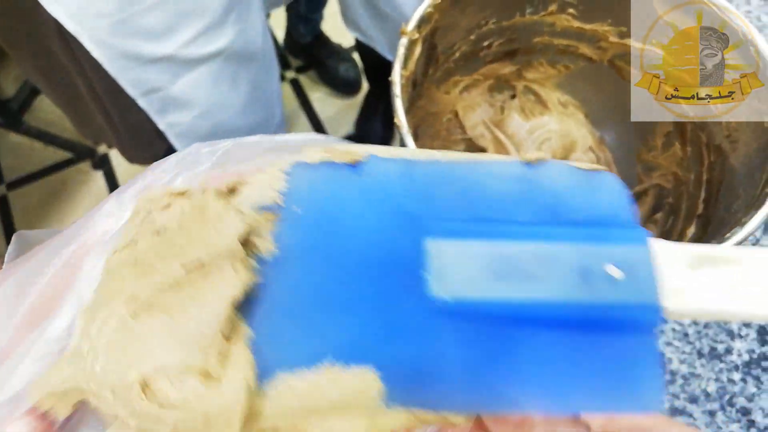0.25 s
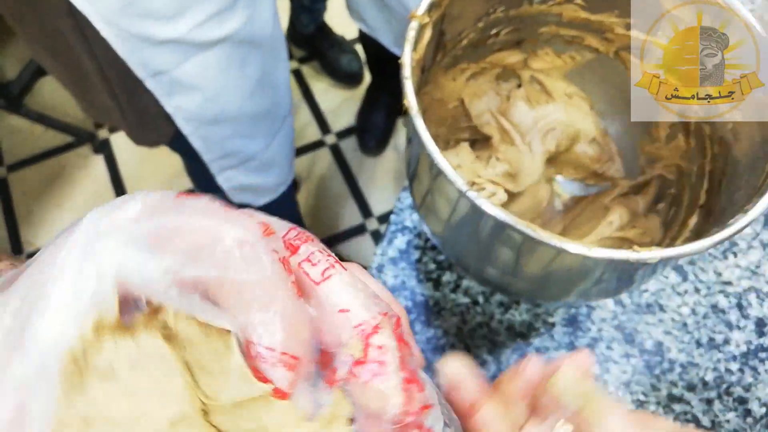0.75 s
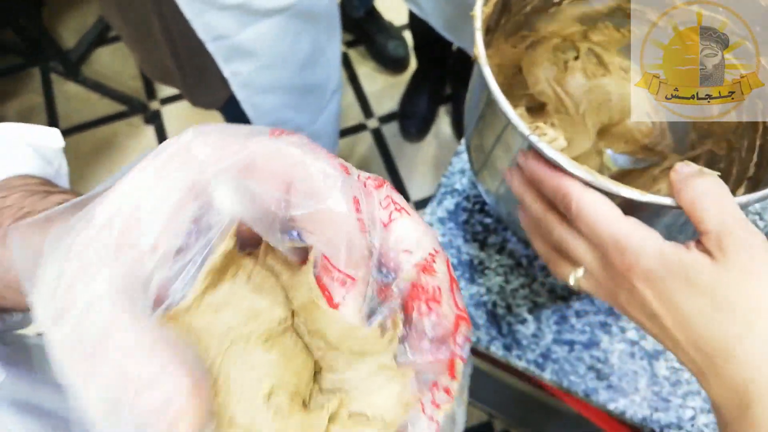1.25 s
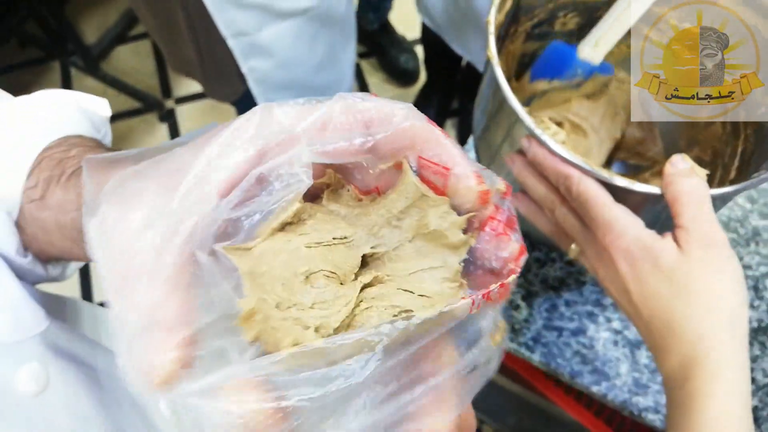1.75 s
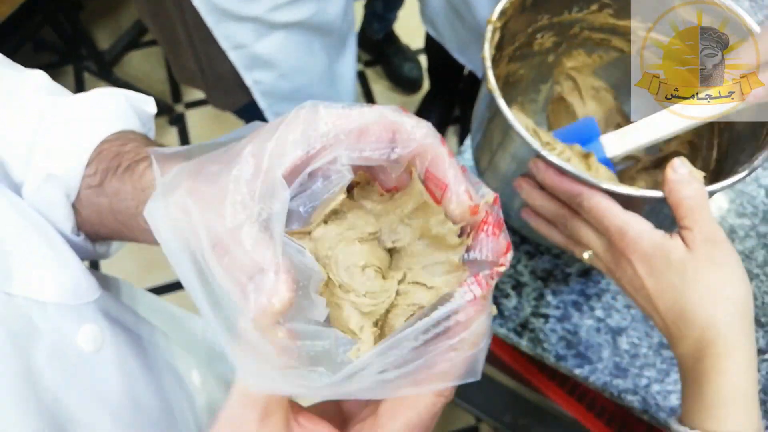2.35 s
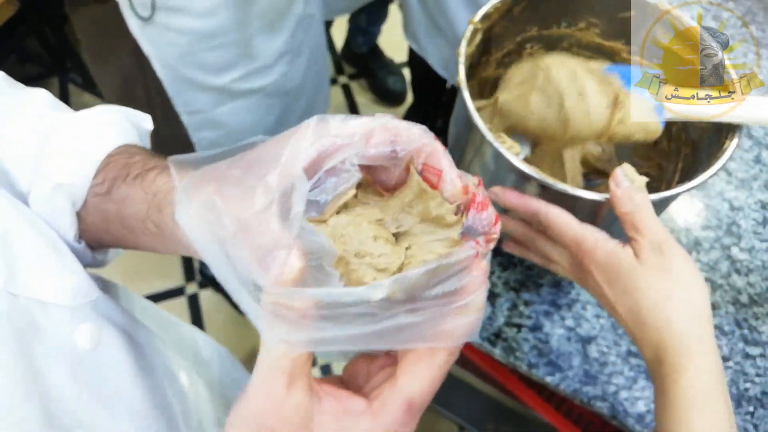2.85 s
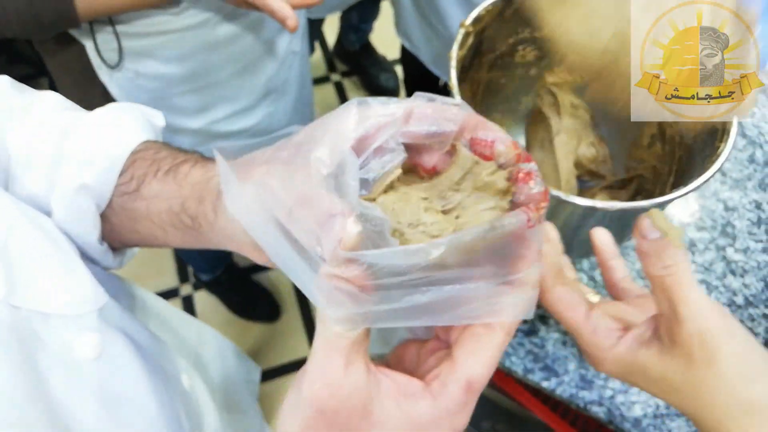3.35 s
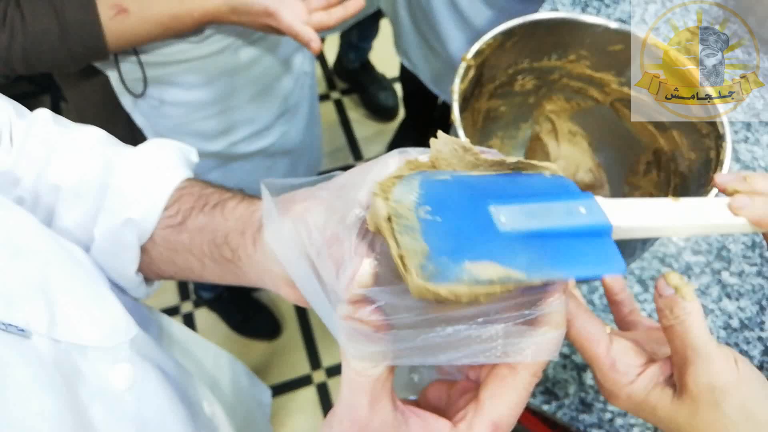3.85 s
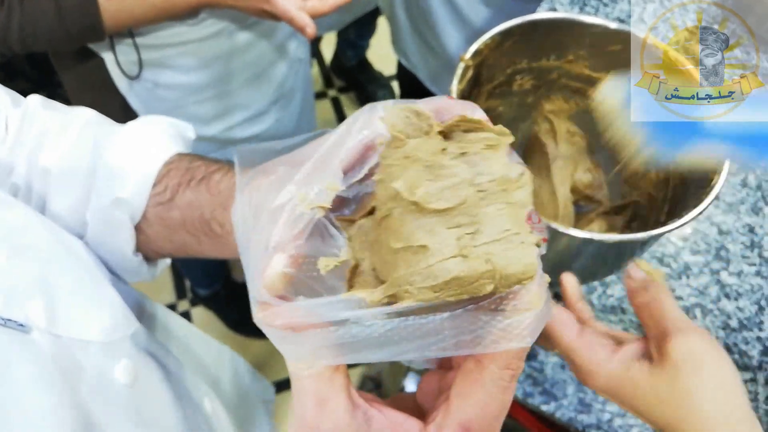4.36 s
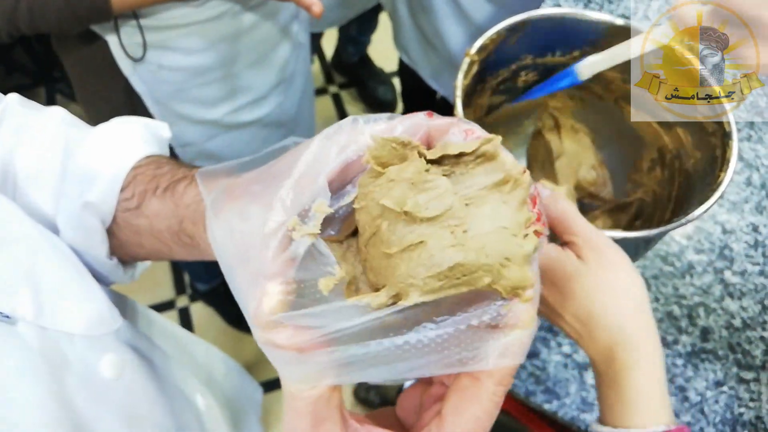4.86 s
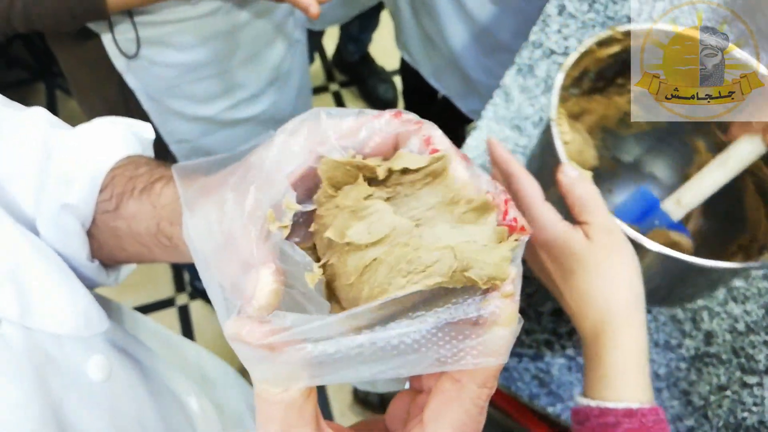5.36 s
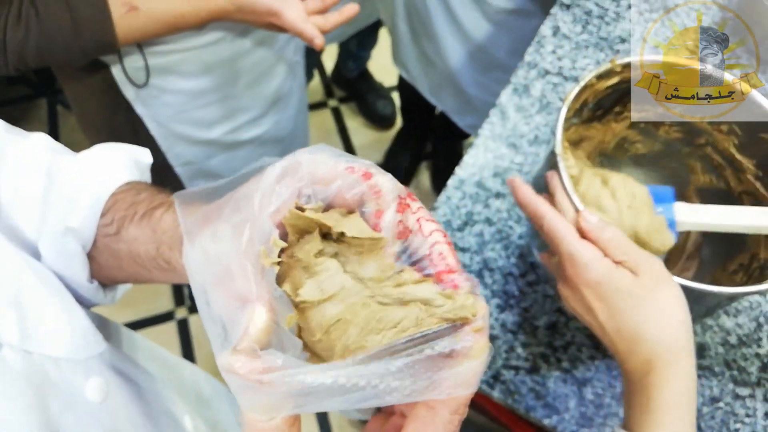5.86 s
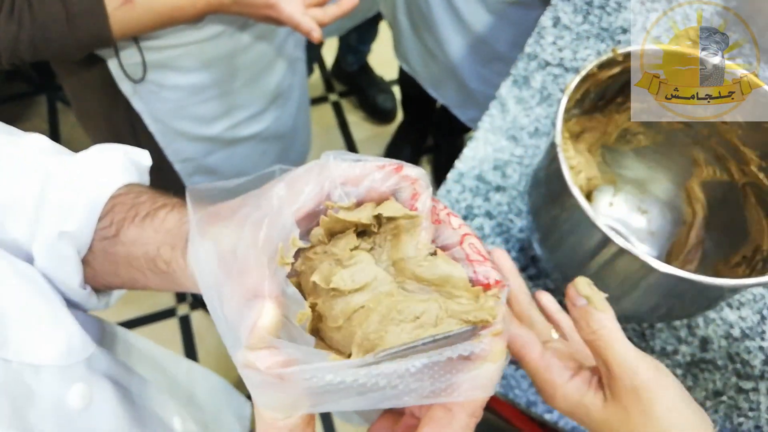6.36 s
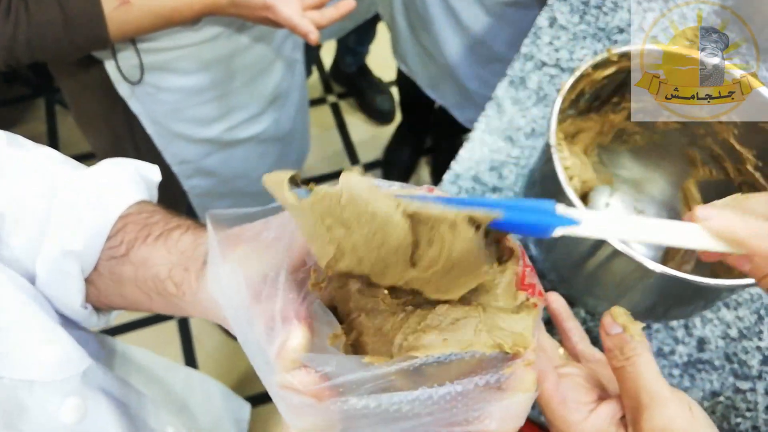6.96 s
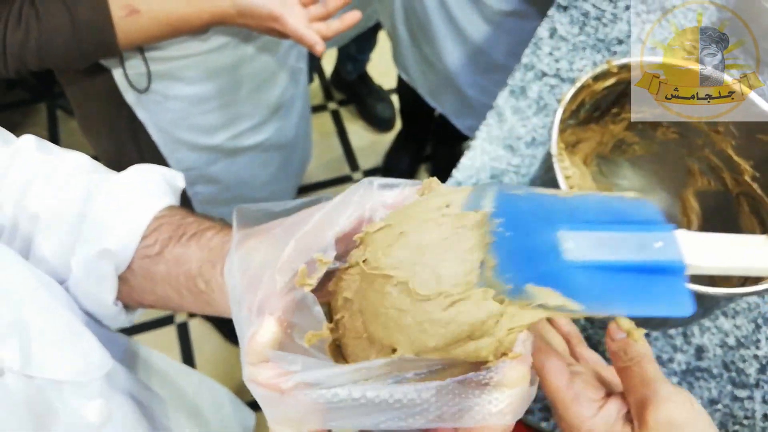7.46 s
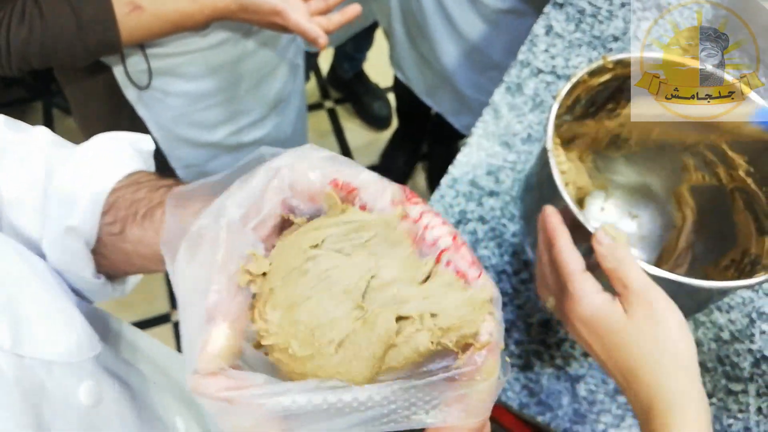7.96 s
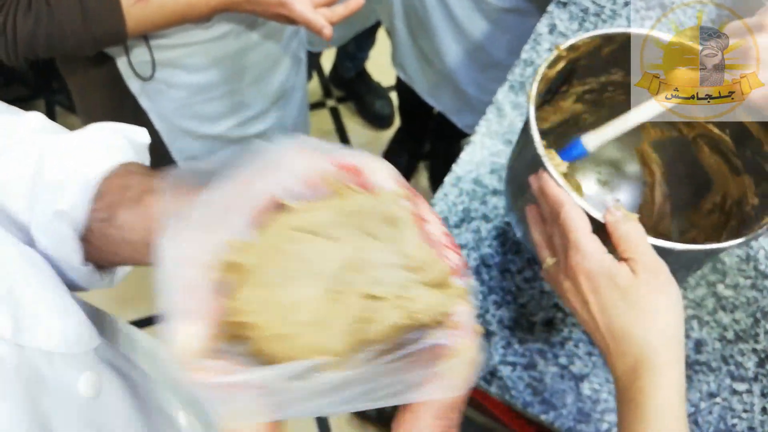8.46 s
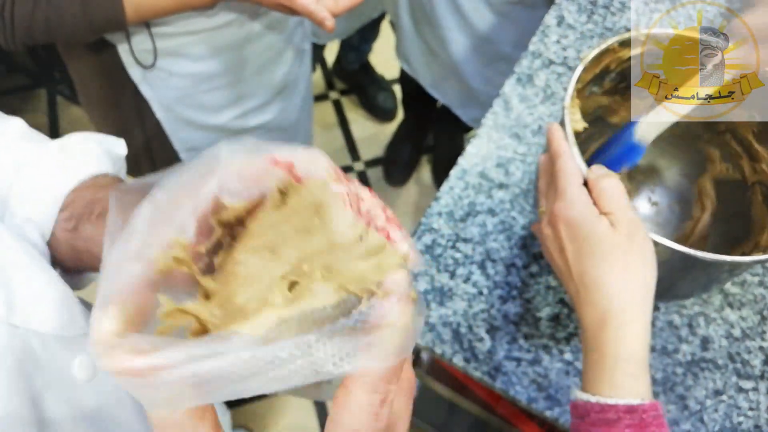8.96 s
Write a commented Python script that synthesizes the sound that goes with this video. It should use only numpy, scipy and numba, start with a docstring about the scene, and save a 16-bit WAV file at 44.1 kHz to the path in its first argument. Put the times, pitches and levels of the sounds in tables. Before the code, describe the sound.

A thin plastic piping bag is handled very close to a stereo microphone in a small hard-walled kitchen. From 0 to about 2 s it crackles densely and brightly in quick uneven bursts, strongest around 0.5 to 1.5 s, with hard snaps near 0.6 and 1.45 s and small low pops underneath. A faint bowl knock comes near 1.8 s, another dull one at 2.8 s. From 2 to 4 s the rustle lightens, with a few pitched, woody crackles around 3 to 3.6 s. From 4 to 7.5 s it is sparse, fine ticking with isolated snaps and a soft bowl tap near 5.8 s. A sharp snap at 7.6 s and another near 8.4 s lead to stronger crackles from 8.5 to 9 s, where a clearer double steel knock lands at 8.8 s, followed by a very faint tap near 9.2 s. A low, slightly wavering refrigerator hum and soft air noise continue throughout.

```python
"""A thin plastic piping bag crackles close to two microphone ports while batter is filled into it in a kitchen.
Each crease that buckles rings patches of film as short decaying sines, a few milliseconds in all; others give
low pops and pitched crackles, one damped sine each. A spatula now and then knocks a steel bowl, whose close
modes beat as they decay. A refrigerator hums as wavering sines over filtered noise, and the tiled room
returns a short noise tail."""
import sys
import numpy as np
from scipy import signal
from scipy.fft import rfft, irfft, next_fast_len
from scipy.io import wavfile
from scipy.ndimage import uniform_filter1d
from numba import njit

SR = 44100
rng = np.random.default_rng(int(sys.argv[2]) if len(sys.argv) > 2 else 0)


def wav_out(sig):
    """Save sig, one row per channel (or a flat mono array), as 16-bit PCM at SR to the path in sys.argv[1]."""
    wavfile.write(sys.argv[1], SR, np.round(np.clip(np.atleast_2d(sig).T, -1, 1) * 32767).astype(np.int16))


N = 406679


def undb(db):
    """Level definition: amplitude ratio of a level in dB."""
    return 10 ** (np.asarray(db) / 20)


def unit(x):
    """Normalisation: scale to an rms of 1."""
    return x / np.sqrt(np.mean(x ** 2))


def curve(table, hz):
    """Spectral interpolation: read (f/Hz, level/dB) points on a log-frequency axis."""
    f, db = np.transpose(table)
    return np.interp(np.log(np.maximum(hz, 1)), np.log(f), db)


def shape(x, gain):
    """Linear filtering: multiply the spectrum by a gain that is a function of f/Hz."""
    size = next_fast_len(N + SR // 4)
    f = np.arange(size // 2 + 1) * SR / size
    return irfft(rfft(x, size) * gain(f), size)[..., :N]


def walk(rate):
    """Random modulation: glide between independent levels, one every 1 / rate s; rms near 0.7."""
    k = int(SR / rate)
    steps = np.repeat(rng.standard_normal(N // k + 1), k)
    return 0.86 * uniform_filter1d(steps, k)[:N]


@njit
def rings(s, hz, t60, size, n, sr):
    """Free damped vibration: sum of exponentially decaying sines, one for each row, cut at t60."""
    y = np.zeros(n)
    for k in range(len(s)):
        turn = np.exp(2j * np.pi * hz[k] / sr - np.log(1000) / (t60[k] * sr))
        z, start = size[k] + 0j, int(s[k] * sr)
        for i in range(max(start, 0), min(start + int(t60[k] * sr), n)):
            y[i] += z.imag
            z *= turn
    return y


# refrigerator tones, the two lowest pairs beating slowly, the others single and wavering:
# (f/Hz, rms level/dB, depth of wavering/dB)
HUM_TONES = [(41.0, -67, 2), (45.0, -63, 9.5), (83.3, -61.5, 1.5), (88.4, -56, 5.5), (161.7, -43.5, 1.0),
             (203, -52, 1.5), (284.6, -54.5, 1), (406.6, -52.5, 5)]
# spectral density of the air noise, relative: (f/Hz, level per Hz/dB)
AIR_SPECTRUM = [(15, -50), (25, -25), (107, -3), (161, 4.5), (248, 1), (361, 1.5), (403, -8), (449, -4.5),
                (749, -12.5), (881, -8.5), (1870, -17.5), (2150, -14.5), (4330, -29), (8490, -24),
                (15800, -90.5)]
AIR_DB = -43  # rms of the part common to both ports


def kitchen():
    """Superposition: wavering refrigerator tones add to air noise whose bass is nearly alike at both ports."""
    t = np.arange(N) / SR
    hum = np.zeros(N)
    for hz, db, waver_db in HUM_TONES:
        level = np.sqrt(2) * undb(db + waver_db * walk(5.5))
        hum += level * np.sin(2 * np.pi * hz * t + 0.92 * walk(5.))
    mid, side = rng.standard_normal((2, N))
    density = lambda hz: undb(curve(AIR_SPECTRUM, hz))
    air = shape(mid, density)
    # the difference between the ports grows with frequency up to 1500 Hz
    wide = shape(side, lambda hz: density(hz) * np.clip(hz / 1500, .3, 1))
    return hum + undb(AIR_DB) * (air + wide * np.array([[1], [-1]])) / np.std(air)


PORT_LAG_S = 0.000099  # the left port hears the bag a little later


def buckle(s, db, centre_hz, count, cycles, spread_s, focus_db, scatter_db):
    """Snap-through buckling: a crease rings patches of film in turn, loudest near a pitch set by its size."""
    pitch = rng.random((len(s), count))
    order = rng.triangular(0, .3, 1, (len(s), 3, count))
    mix = rng.standard_normal((len(s), 3, count))
    # one patch at random in each of count equal log bands from 350 to 16100 Hz
    hz = 350 * 46 ** ((np.arange(count) + pitch) / count)
    off_pitch_octaves = np.log2(hz / centre_hz[:, None])
    # size grows with pitch so that, without the focus, the sum is white
    size = hz / 10000 * undb(db[:, None] - focus_db * off_pitch_octaves ** 2)
    # long waves reach both ports alike, short ones by different paths
    alike = 1 / (1 + (hz / 2000) ** 2)
    ports = []
    for k, lag_s in enumerate((PORT_LAG_S, 0)):
        delay = np.where(alike > .3, order[:, 2], order[:, k])
        start = s[:, None] + lag_s + spread_s * delay
        heard = size * undb(scatter_db * (alike * mix[:, 2] + (1 - alike) * mix[:, k]))
        ports.append(rings(start.ravel(), hz.ravel(), (cycles / hz).ravel(), heard.ravel(), N, 1. * SR))
    return np.array(ports)


STRAIN_S = 0.088  # time over which the hands reload the film


def crackle(per_s, bunch_db, tail_db, centre_hz, octaves, **ringing):
    """Stored strain energy: creases buckle at random moments, a few far larger than most, each at its own pitch."""
    when, rank, detune = rng.random((int(per_s * N / SR), 3)).T
    at = (when * N).astype(int)
    hz = centre_hz[at] * 2 ** (octaves[at] * (detune - .5))
    # a loud bunch spends the strain in the film, so a lull goes with it
    strain = uniform_filter1d(undb(2 * bunch_db), int(STRAIN_S * SR))
    bunched_db = (bunch_db - 10 * np.log10(strain))[at]
    return buckle(at / SR, bunched_db - tail_db[at] * np.log(rank + 0.0041), hz, **ringing)


# grips and pushes on the bag, each a burst of crackle:
# (start t/s, held t/s, fine crease level/dB, level of larger folds relative to fine/dB)
SQUEEZES = [(0.01, 0.096, -22.5, -11.5), (0.18, 0.042, -26.5, -12), (0.29, 0.024, -22, -11.5),
            (0.41, 0.0079, -17, -14.5), (0.487, 0.12, -15, -14), (0.63, 0.15, -18, -16),
            (0.841, 0.25, -14, -18), (1.122, 0.031, -8, -16), (1.21, 0.0, -12.5, -14),
            (1.33, 0.16, -14.5, -16.5), (1.52, 0.026, -24.5, -13), (1.63, 0.05, -20, -13.5),
            (1.76, 0.11, -14.5, -15), (2.01, 0.021, -19.5, -11), (2.11, 0.17, -22, -14.5),
            (2.33, 0.045, -20.5, -13.5), (2.51, 0.47, -27.5, -12), (2.93, 0.064, -23.5, -13),
            (3.072, 0.21, -25.5, -8.5), (3.408, 0.021, -27, -8), (3.58, 0.11, -29.5, -7.5),
            (3.798, 0.057, -24.5, -7), (3.94, 0.15, -36.5, -8.5), (4.24, 0.065, -29.5, -6.5),
            (4.39, 0.066, -22.5, -8), (4.55, 0.038, -26.5, -10.5), (4.649, 0.079, -20, -8),
            (4.831, 0.29, -32, -9.5), (4.92, 0.12, -25, -9.5), (5.252, 0.14, -25.5, -10),
            (5.48, 0.079, -29, -11), (5.59, 0.089, -22.5, -8.5), (5.74, 0.15, -31, -9),
            (5.88, 0.15, -29, -5.5), (6.16, 0.097, -28.5, -8), (6.34, 0.0047, -34.5, -8),
            (6.441, 0.063, -26, -6.5), (6.91, 0.016, -37.5, -8.5), (7.03, 0.025, -42.5, -4),
            (7.14, 0.14, -35, -15), (7.35, 0.31, -40, -6.5), (7.54, 0.18, -26.5, -10.5),
            (7.79, 0.38, -25.5, -12.5), (8.08, 0.082, -34, -13), (8.28, 0.16, -27.5, -11),
            (8.495, 0.0011, -14, -12), (8.63, 0.076, -19, -15), (8.803, 0, -10, -10.5),
            (8.93, 0.052, -21.5, -13), (9.091, 0, -18.5, -9.5), (9.19, 0.0, -33, -8.5)]
SWELL_DB_PER_S, EASE_DB_PER_S = 339, 227  # how fast a burst builds up and dies away


def bursts(t, db, still_db):
    """Addition of powers: level in dB of overlapping squeezes that swell, hold and ease off."""
    start, held = np.transpose(SQUEEZES)[:2, :, None]
    swell_db = SWELL_DB_PER_S * np.maximum(start - t, 0)
    ease_db = EASE_DB_PER_S * np.maximum(t - start - held, 0)
    power = undb(2 * (db[:, None] - swell_db - ease_db))
    return 10 * np.log10(np.sum(power, axis=0) + undb(2 * still_db))


SETTLING_DB, SETTLING_FOLDS_DB = -50, -51.5  # the film never lies quite still


def handling():
    """Intermittent loading: levels of fine creases and folds in dB, their sparseness and their bunching in dB."""
    t = np.arange(N) / SR
    coarse = t[::64]
    creases_db, folds_db = np.transpose(SQUEEZES)[2:]
    fine_db = np.interp(t, coarse, bursts(coarse, creases_db, SETTLING_DB))
    loose_db = np.interp(t, coarse, bursts(coarse, creases_db + folds_db, SETTLING_FOLDS_DB))
    # gentle handling leaves longer lulls
    sparse = np.clip(0.7 - 0.057 * (fine_db + 20.5), .6, 1.7)
    # one crease sets off its neighbours, so sizes come in bunches
    slips_db = sparse * (3.25 * walk(110.) + 1.15 * walk(60.))
    return fine_db, loose_db, sparse, slips_db


# relative response of the film: (f/Hz, level per Hz/dB)
FILM_RESPONSE = [(120, -27), (200, -19.5), (305, -9.5), (408, -7), (547, -7.5), (693, -8), (1080, -9.5),
                 (1290, -8), (2150, -8.5), (4100, -3.5), (6330, -1.5), (7890, -2), (10000, 2), (15800, -6)]


def film_colour(x):
    """Radiation response: the film weights every crease by the same spectrum."""
    return shape(x, lambda hz: undb(curve(FILM_RESPONSE, hz)))


# mean pitch of the creases and its spread, narrowest from about 4.5 to 6.4 s, before a slow wander:
# (t/s, mean f/Hz, full width of the spread/octaves)
CREASE_PITCH = [(0, 9100, 1.54), (1.8, 9360, 1.75), (3.1, 9000, 1.2), (4.5, 9200, 0.45), (6.4, 8440, 0.58),
                (9.2, 9000, 1.6)]
CREASES_PER_S = 1400


def fine_creases(fine_db, sparse, slips_db):
    """Small-scale buckling: many small, quickly damped patches crackle in bunches."""
    when, hz, octaves = np.transpose(CREASE_PITCH)
    t = np.arange(N) / SR
    bunch_db = slips_db + 1.46 * walk(220.)
    centre_hz = np.interp(t, when, hz) * 2 ** (0.23 * walk(11.0))
    fine = crackle(CREASES_PER_S, bunch_db, 1.92 * sparse, centre_hz, np.interp(t, when, octaves),
                   count=14, cycles=4.3, spread_s=.0025, focus_db=19.0, scatter_db=6.0)
    return unit(film_colour(fine)) * undb(fine_db)


# resonance of the pocket of air in the cupped bag: (t/s, f/Hz)
AIR_POCKET = [(0.0, 1460), (2.62, 1800), (2.92, 2130), (3.54, 2070), (3.88, 2090), (7.06, 2000),
              (7.96, 2170), (8.81, 1700), (9.22, 1780)]
FOLDS_PER_S = 500


def larger_folds(loose_db, sparse, slips_db, pocket_hz):
    """Cavity resonance: larger folds ring longer, near the pitch of the enclosed pocket of air."""
    centre_hz = pocket_hz * 2 ** (0.24 * walk(17.0))
    folds = crackle(FOLDS_PER_S, 0.5 * slips_db, 2.14 * sparse, centre_hz, np.full(N, 1.0),
                    count=16, cycles=13.0, spread_s=.003, focus_db=20.5, scatter_db=3.5)
    return unit(film_colour(folds)) * undb(loose_db)


# clearest single snaps, levels before the trims below:
# (t/s, peak level/dB, level of the dull part relative to the peak/dB, f/Hz)
LOUD_SNAPS = [(0.106, -7, -44, 9100), (0.155, -14, -30, 8000), (0.2226, -7, -37, 5970),
              (0.2874, 1.5, -32, 9100), (0.3107, -4.5, -36, 9340), (0.385, -6, -30, 5500),
              (0.409, 4, -40, 9400), (0.5896, 10, -31, 11700), (0.64, -4, -36, 9840), (0.659, 3, -46, 9610),
              (0.884, -6, -25, 9920), (0.8983, 5, -30, 9700), (0.965, -1, -28, 9700),
              (1.0995, -7, -19, 10400), (1.3209, -2.5, -22.5, 10400), (1.386, -2, -23, 10600),
              (1.4514, 10, -33, 9450), (1.55, -0.5, -33, 11500), (1.754, -2, -20, 10500),
              (2.0266, -9, -18, 8180), (2.148, -7.5, -30, 11000), (2.1759, -5.5, -20, 9890),
              (2.3478, 3, -33, 6460), (2.422, -4, -28, 9250), (2.476, -12, -21, 6870),
              (2.5234, -7.5, -31, 8140), (2.5788, -5.5, -39, 6300), (2.644, -6, -26, 9400),
              (2.689, -7, -36, 6300), (2.726, -14, -33, 9600), (2.9358, -8.5, -21, 9160),
              (2.9803, -4.5, -31, 7150), (3.044, -13, -16, 10300), (3.0754, -8, -37, 9800),
              (3.145, -3, -26, 8600), (3.1865, -2, -20, 9200), (3.3371, -26, -18, 9510),
              (3.363, -14, -15.5, 9400), (3.407, -4, -31, 11100), (3.4516, -8, -25, 8300),
              (3.479, -19, -14, 8810), (3.581, -10, -27, 8870), (3.6084, -5, -17, 8950),
              (3.6818, -7.5, -24, 8400), (3.929, -7.5, -16.5, 9000), (4.155, -9.5, -18, 11300),
              (4.215, -14.5, -29, 8390), (4.396, -10, -17, 8800), (4.558, -8.5, -20, 10200),
              (4.582, -9, -21, 8300), (4.691, -9, -22, 9000), (4.856, -10, -40, 10300),
              (5.102, 0, -27, 10000), (5.258, -8.5, -21, 11100), (5.375, -7, -30, 10800),
              (5.88, -9, -36, 9300), (6.0055, -5.5, -36, 8500), (6.1025, -7, -22, 8900),
              (6.173, -15, -12, 8520), (6.2173, -17, -27, 9080), (6.2405, -11, -13, 8510),
              (6.292, -13.5, -17, 6500), (6.302, -12, -29, 11000), (6.336, -15.5, -19, 10400),
              (6.4327, -7.5, -20, 7400), (6.442, -9, -21, 8000), (6.4627, -8, -20, 8700),
              (6.489, -4.5, -32, 8640), (6.541, -10.5, -21, 8500), (6.6717, -20, -23, 6800),
              (6.776, -7.5, -44, 10200), (6.8857, -16, -24, 9150), (6.905, -18, -21, 9800),
              (6.918, -17, -26, 7000), (7.013, -13.5, -25, 6640), (7.1336, -21, -13, 9560),
              (7.1487, -15, -18, 11900), (7.2043, -10.5, -29, 6300), (7.222, -8, -31, 9890),
              (7.269, -13.5, -28, 7500), (7.3006, -18, -14, 8000), (7.347, -14, -36, 8250),
              (7.3718, -15.5, -36, 9180), (7.452, -16.5, -22, 9490), (7.492, -10.5, -22, 8140),
              (7.6108, 3, -25, 10100), (7.82, -11, -36, 9620), (8.036, -10, -22, 9600),
              (8.1763, -6.5, -27.5, 10250), (8.3893, 2, -28, 8290), (8.48, -5, -26, 10300),
              (8.6293, -12, -29, 10800), (8.7874, -5, -22, 7820), (8.9335, 1, -37, 6300),
              (9.051, -5, -41, 10200)]


def loud_snaps(pocket_hz):
    """Impulsive excitation: each snap is a bright crack of film with a dull body from the air pocket."""
    when, peak_db, dull_db, hz = np.transpose(LOUD_SNAPS)
    crack = buckle(when + 0.00037, peak_db - 0.5, hz,
                   count=40, cycles=10.3, spread_s=.0021, focus_db=23.0, scatter_db=5.5)
    body = buckle(when + 0.00034, peak_db + dull_db + 20.5, pocket_hz[(when * SR).astype(int)],
                  count=24, cycles=32.0, spread_s=0.00198, focus_db=11.0, scatter_db=3.0)
    return film_colour(crack + body)


# low pops of slack film and pitched crackles near 1-3.4 kHz, levels before a 2 dB cut:
# (t/s, peak level/dB, f/Hz)
POPS_AND_CRACKLES = [(0.408, -18, 587), (0.487, -26, 463), (0.569, -24, 514), (0.748, -18.5, 448),
                     (0.897, -18.5, 355), (0.964, -16, 900), (1.03, -20, 670), (1.061, -19.5, 444),
                     (1.493, -26, 630), (1.539, -20.5, 414), (1.789, -21.5, 615), (2.297, -24, 420),
                     (2.9365, -13.5, 2200), (3.0765, -10, 2150), (3.1895, -14, 2000), (3.5793, -15, 2900),
                     (3.6235, -8, 3420), (3.7823, -19, 1150)]
POP_CYCLES = 16  # cycles in which each falls by 60 dB


def pops_and_pitched_crackles():
    """Damped free vibration: each pop or pitched crackle is one short damped sine, alike at both ports."""
    when, peak_db, hz = np.transpose(POPS_AND_CRACKLES)
    return rings(when, hz, POP_CYCLES / hz, undb(peak_db - 2.0), N, 1. * SR)


# drift of the bag across the front of the ports: (t/s, left minus right level/dB)
BAG_PAN = [(0, -3.5), (1.5, -2.5), (3.2, 0.5), (6.2, 0.5), (7.0, -0.5), (8.0, 0), (9.2, -1)]


def bag():
    """Superposition: creases, folds, snaps, pops and pitched crackles add, panned by a level difference."""
    t = np.arange(N) / SR
    pocket_hz = np.interp(t, *np.transpose(AIR_POCKET))
    fine_db, loose_db, sparse, slips_db = handling()
    film = fine_creases(fine_db, sparse, slips_db) + larger_folds(loose_db, sparse, slips_db, pocket_hz)
    film = film + loud_snaps(pocket_hz) + pops_and_pitched_crackles()
    pan_db = np.interp(t, *np.transpose(BAG_PAN))
    return film * undb(np.outer([.5, -.5], pan_db))


ROOM_T60_S = 0.16


def room(x):
    """Diffuse reverberation: convolve with an exponentially decaying scatter of echoes, its own for each port."""
    t = np.arange(SR // 2) / SR
    tail = rng.standard_normal((2, len(t))) * undb(-60 * t / ROOM_T60_S) * (t > .002)
    tail /= np.sqrt(np.sum(tail ** 2, axis=1, keepdims=True))
    # clothes and hands nearby soak up the treble
    tail = signal.sosfilt(signal.butter(1, 5000, fs=SR, output="sos"), tail)
    return signal.fftconvolve(x, tail, axes=1)[:, :N]


# spatula knocks, and two swells of the ring soon after a knock (2.8166 s, 8.8267 s), levels before a 17.5 dB
# cut: # (t/s, peak level/dB, fall of the modes below 430 Hz/dB per octave, negative for a rise)
KNOCKS = [(1.833, -17.5, -5), (2.7802, -9.5, -5.5), (2.8166, -20, -9), (5.8368, -12, 18.5), (8.7903, -2, 8),
          (8.7973, -2, 7), (8.8267, -7, 3), (9.159, -22, 6)]
# modes of the bowl, damped by batter and a hand: (f/Hz, relative level/dB, 60 dB decay t/s)
BOWL_MODES = [(250, -3.5, 0.25), (272.4, -3, 0.22), (328, -4, 0.17), (406.3, 0, 0.081), (425, -3, 0.28),
              (440, -1, 0.33), (469, 2, 0.098), (572, -12.5, 0.06), (863, -5, 0.1), (1210, -3, 0.11)]
BOWL_LAG_S = 0.00025


def bowl():
    """Modal synthesis: every knock rings the same modes, and close pairs of them beat."""
    s, peak_db, tilt_db = np.transpose(KNOCKS)[:, :, None]
    hz, db, t60 = np.transpose(BOWL_MODES)
    size = -undb(peak_db + db + tilt_db * np.log2(np.minimum(hz / 430, 1)) - 17.5)
    same = np.ones_like(size)  # one row per knock, one column per mode
    ring = rings((s * same).ravel(), (hz * same).ravel(), (t60 * same).ravel(), size.ravel(), N, 1. * SR)
    # batter and hand touch the wall unevenly, so the ring wavers
    ring = ring * undb(2.7 * walk(45.))
    ring = signal.sosfilt(signal.butter(2, [190, 1600], "band", fs=SR, output="sos"), ring)
    # the bowl stands to the right, so it reaches the left port later
    return np.array([np.roll(ring, int(BOWL_LAG_S * SR)), ring])


BAG_ROOM_DB, BOWL_ROOM_DB = -7, -4  # send of each source into the room


def scene():
    """Superposition: direct sound of bag and bowl, their reverberation and the kitchen background."""
    film, steel = bag(), bowl()
    echoes = room(undb(BAG_ROOM_DB) * film + undb(BOWL_ROOM_DB) * steel)
    return film + steel + echoes + kitchen()


# unequal response of the two microphone ports: (f/Hz, left minus right level/dB)
PORT_BALANCE = [(60, -6.5), (110, 1), (200, -2.5), (380, 0), (700, -1), (1290, -2.5), (2380, 2.5),
                (4400, 0.5), (8120, 10.5), (15000, 1)]
TOP_HZ = 15900


def record(dry):
    """Transducer response: the ports colour the sound differently, peaks clip at full scale, the top is cut."""
    ports = shape(dry, lambda hz: undb(np.outer([.5, -.5], curve(PORT_BALANCE, hz))))
    top_cut = signal.ellip(12, .2, 75, TOP_HZ, fs=SR, output="sos")
    return signal.sosfilt(top_cut, np.clip(ports, -1, 1))


dry = scene()
out = record(dry)
wav_out(out)
```